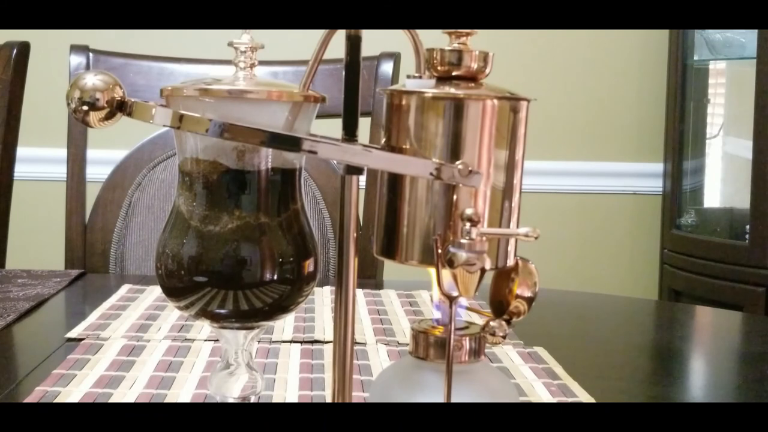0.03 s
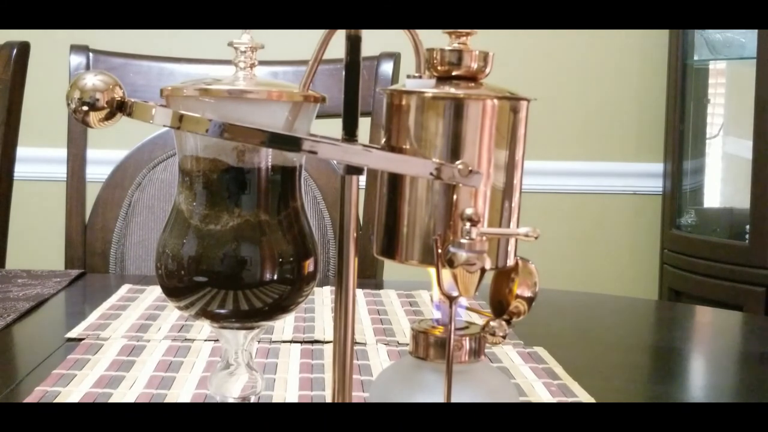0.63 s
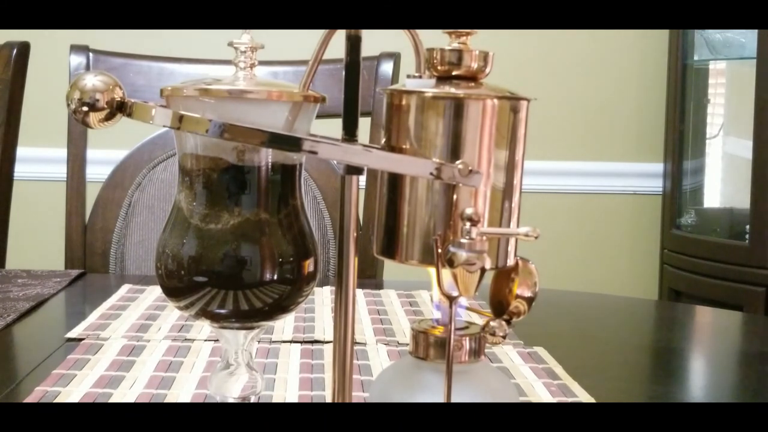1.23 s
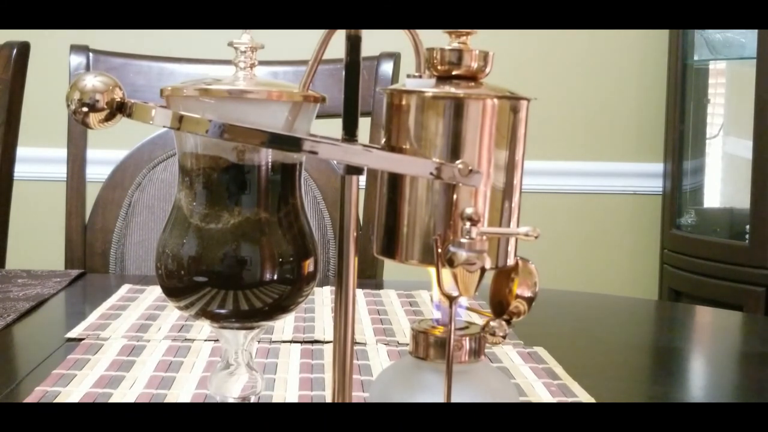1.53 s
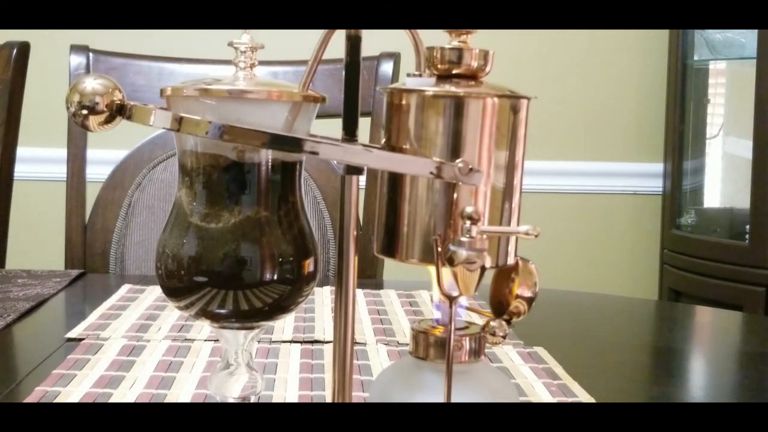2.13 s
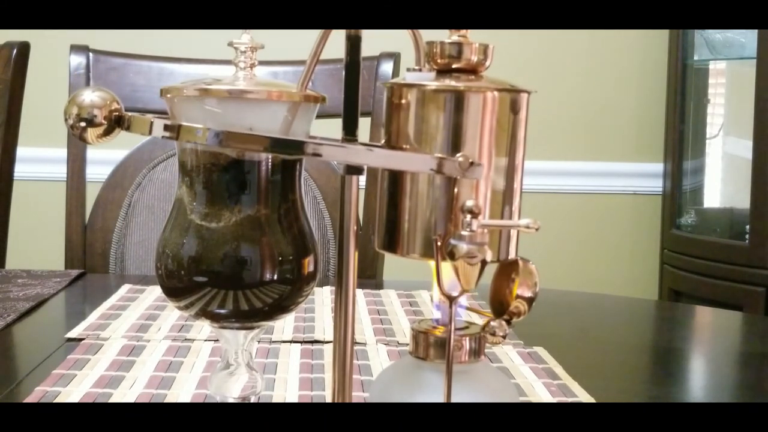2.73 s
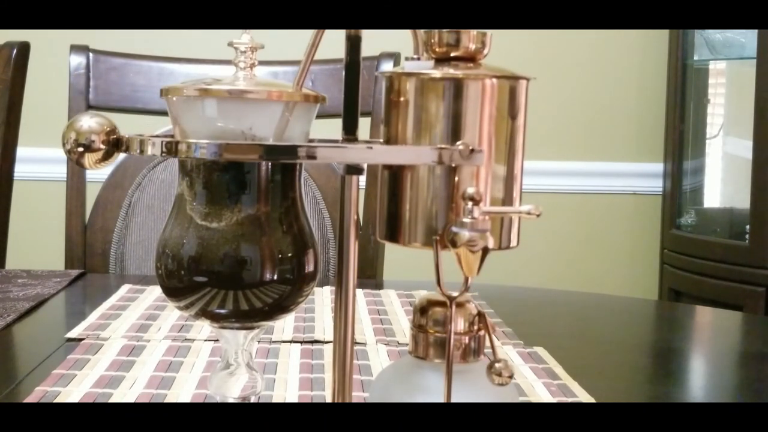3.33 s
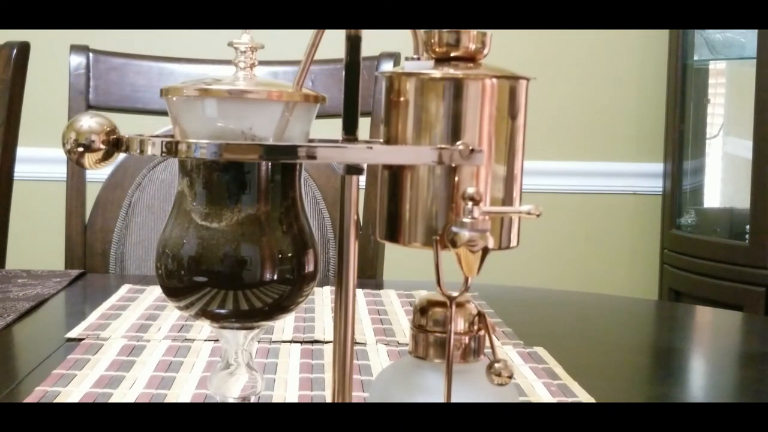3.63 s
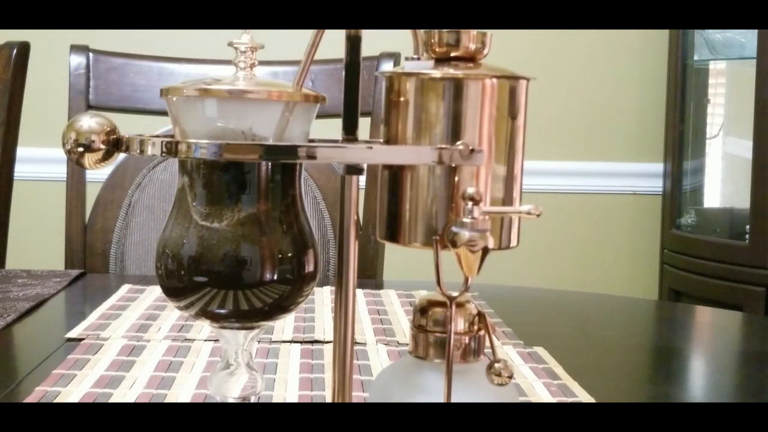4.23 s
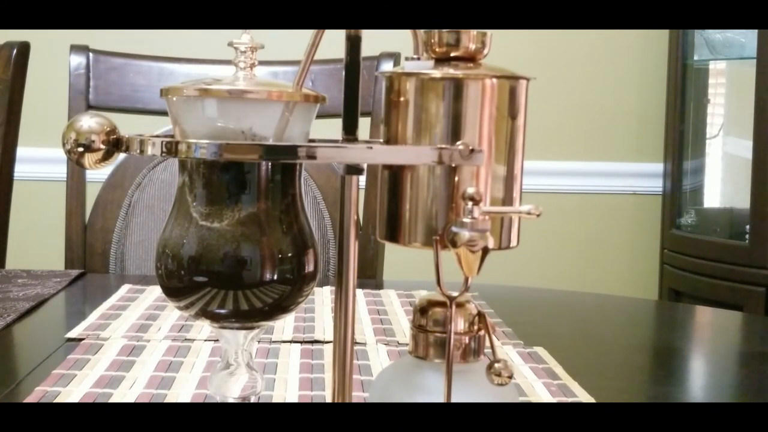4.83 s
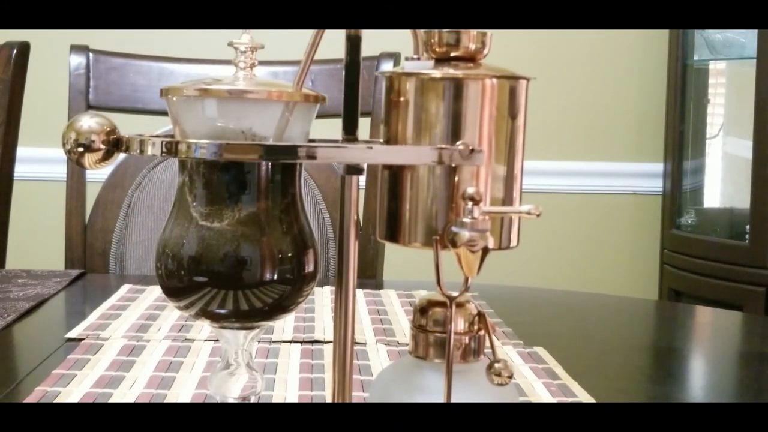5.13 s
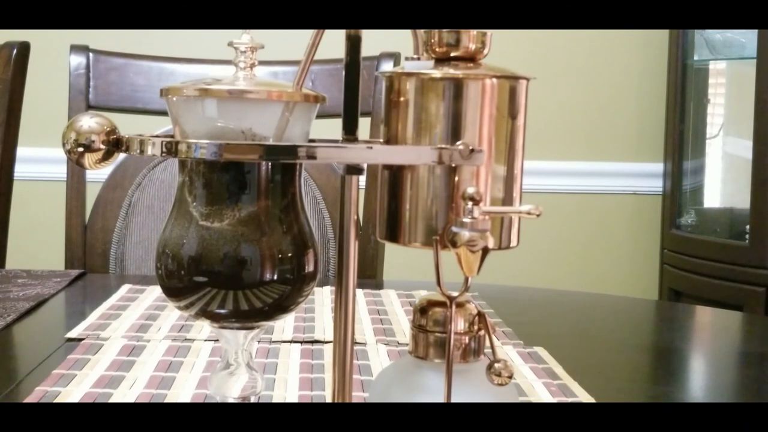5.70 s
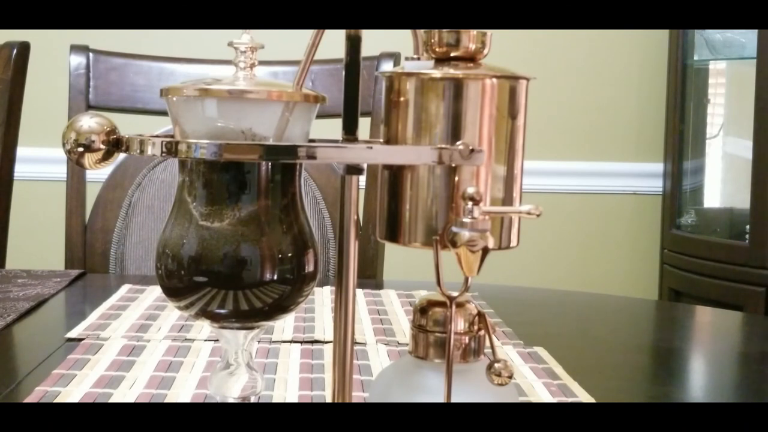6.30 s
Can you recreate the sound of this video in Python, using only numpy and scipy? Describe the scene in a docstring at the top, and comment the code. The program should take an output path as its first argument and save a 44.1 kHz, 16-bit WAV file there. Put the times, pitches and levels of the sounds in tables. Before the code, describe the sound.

Water seethes and glugs softly in the metal boiler of a siphon coffee maker while the hot metal gives small irregular ticks. About halfway through, the burner's lid scrapes free, clacks sharply shut and rattles to rest with a brief ring, thumping the table. The boiling then dies away, leaving a low hum and thin hiss. Heard close up in stereo in a quiet room.

```python
"""Balance siphon coffee maker on a dining table.

Close to a stereo pair of microphones, water seethes and glugs in the boiler and hot metal ticks.
The emptied boiler lifts and lets go of the burner's lid, which scrapes free, clacks shut and
rattles to rest, thumping the table. With the flame out the boiling dies away and leaves
the room's low hum and a thin hiss, mostly on the left."""
import sys
import numpy as np
from scipy import signal
from scipy.fft import rfft, irfft, next_fast_len
from scipy.io import wavfile
from scipy.ndimage import uniform_filter1d

SR = 44100
rng = np.random.default_rng(int(sys.argv[2]) if len(sys.argv) > 2 else 0)


def store_pcm(level_fs):
    """Save levels as 16-bit WAV."""
    pcm = np.round(np.clip(level_fs, -1, 1) * 32767).astype(np.int16)
    wavfile.write(sys.argv[1], SR, np.atleast_2d(pcm).T)


N = 280476
T = np.arange(N) / SR
FFT_SIZE = next_fast_len(N, True)
FREQS = np.fft.rfftfreq(FFT_SIZE, 1 / SR)


# the lid's blows, in relative levels: (time [s], clang [dB], shimmer [dB], table thump [dB],
# rim buzz [dB], edge ping [dB], lid ring [dB])
LID_BLOWS = [(3.0387, -25, -28.5, -25.5, -50, -52, -35), (3.0487, -32, -34, -49, -42, -56, -31),
             (3.052, -29, -34, -53, -37, -56, -30.5), (3.0574, -30, -35, -37, -48, -56, -38),
             (3.0622, -40, -44, -31, -49, -56, -37), (3.0705, -32.5, -42, -44, -50, -60, -26),
             (3.1262, -32, -31.5, -49, -42, -37, -33), (3.14, -33, -35, -59, -51, -35, -39),
             (3.154, -35, -40, -36, -54, -52, -45), (3.169, -41, -41, -61, -56, -55, -50),
             (3.196, -39, -50, -49, -49, -58, -45), (3.216, -39, -55, -44, -45, -60, -36),
             (3.227, -43, -45, -60, -44, -48, -60), (3.246, -57, -54, -60, -45, -39, -60),
             (3.275, -43, -48, -57, -44, -62, -50), (3.296, -43, -49, -46, -46, -66, -60),
             (3.3196, -49, -53, -58, -48, -70, -62), (3.355, -62, -56, -49, -51, -70, -49)]
# spectra of the clang, its bright shimmer and the rim's buzz: (frequency [Hz], relative level [dB])
CLANG_SPECTRUM = [(100, -36), (330, -4), (550, -7.5), (720, -2.5), (1000, -4.5), (1220, -2), (1550, 0.5),
                  (2000, -5), (2800, 0.5), (4000, -10.5), (5500, -14), (7000, -19), (8000, -59),
                  (16000, -34)]
SHIMMER_SPECTRUM = [(3000, -31), (7000, -23.5), (8800, -22), (10300, -8), (11700, -1.5), (12700, 2),
                    (13100, 1), (13600, -1), (15500, -1), (17000, -6.5)]
BUZZ_SPECTRUM = [(1300, -31), (1720, 0), (1900, 2), (2200, -6), (2600, -23), (5000, -41)]
# modes of lid and burner, rim and thin edge: (frequency [Hz], relative level [dB], nominal t60 [s])
LID_MODES = [(662, -22, .55), (732, -17.5, .7), (778, -20, .55), (877, -23, .7), (902, -20, .7),
             (1114, -20, .48), (1167, -7.5, .54), (1190, -16, .5), (1218, -13.5, .52), (1238, -17.5, .5),
             (1287, -16.5, .42), (1425, -18.5, .6), (1470, -20, .6), (1733, -19, .65), (1765, -19, .65),
             (2105, -22, .8), (2256, -21, .75), (2859, -26, .6), (3176, -25, .6), (3445, -28, .55),
             (13614, -25, .55), (14231, -25, .55), (14290, -24, .55), (15370, -22, .55), (15710, -27, .5)]
BUZZ_MODES = [(1815, -4, .4), (1868, -2, .45), (1943, -3, .5), (2110, -3, .65), (2191, -5, .6),
              (2240, -6, .6)]
EDGE_MODES = [(12938, 0, .28), (13066, -6, .36), (13157, -11, .5)]
def lid():
    """Close by, the lid slams on the burner, bounces and rocks on its rim, shaking the table."""
    times, clang_db, shimmer_db, thump_db, buzz_db, ping_db, ring_db = np.transpose(LID_BLOWS)
    clang = strike(times, clang_db, contact_t60=0.034, room_t60=0.58, room_db=-8, grain_db=2.5)
    shimmer = strike(times, shimmer_db, contact_t60=0.044, room_t60=0.45, room_db=-4.7, grain_db=3)
    buzz = strike(times, buzz_db, contact_t60=0.059, room_t60=0.44, room_db=-2.5, grain_db=5)
    ring = metal_ring(LID_MODES, times, ring_db - 4.5, t60_scale=1, blur_hz=2.3)
    return (at_mics(clang, tone_filter(CLANG_SPECTRUM), left_db=-4)
            + at_mics(shimmer, tone_filter(SHIMMER_SPECTRUM), left_db=-1)
            + amp(-2.5) * at_mics(buzz, tone_filter(BUZZ_SPECTRUM), left_db=-1)
            + ring * amp([[0.4], [-0.4]])
            + metal_ring(BUZZ_MODES, times, buzz_db - 7.5, t60_scale=0.93, blur_hz=7.7)
            + metal_ring(EDGE_MODES, times, ping_db - 5, t60_scale=0.92, blur_hz=4)
            + knock(times, thump_db + 3.5, hz=737, swell_s=0.00097)  # the burner's hollow clonk
            + knock(times, thump_db + 0.5, hz=203, swell_s=0.0035)  # the stand against the table
            + table_thump(times, thump_db))


def metal_ring(modes, times, db, t60_scale, blur_hz, apart=0.55):
    """Blows feed the modes; the room blurs each ringing tone, a little differently at each microphone."""
    start, length = int(min(times) * SR), 2 * SR
    span = slice(start, start + length)
    energy = impulses(times, amp(db) ** 2)[span]
    out = np.zeros((2, N))
    for hz, level, t60 in modes:
        walks = np.cumsum(rng.standard_normal((3, length)), 1)
        left, right, shared = uniform_filter1d(walks, size=200) * np.sqrt(2 * np.pi * blur_hz / SR)
        drift = shared + apart * np.array([left, right])
        tone = np.sin(2 * np.pi * (hz * T[:length] + rng.random()) + drift)
        out[:, span] += amp(level) * np.sqrt(decay(energy, t60_scale * t60)) * tone
    return out


def knock(times, db, hz, swell_s):
    """The lid's weight pushes on what lies under it, which swings once or twice."""
    t = T[:SR // 10]
    age = t / swell_s
    push = -age ** 2 * np.exp(2 * (1 - age)) * np.sin(2 * np.pi * hz * t)
    return signal.oaconvolve(impulses(times, amp(db)), push)[:N]


# the dull thud under the burner: (frequency [Hz], relative level [dB])
THUD_SPECTRUM = [(20, -28), (45, -19), (80, -3), (170, 2), (230, -3), (350, -9.5), (600, -8), (1000, -32),
                 (2000, -63)]
# the table top's modes: (frequency [Hz], relative level [dB], t60 [s])
TABLE_MODES = [(62.6, -20, 0.27), (99, -12, 0.45), (139.6, -11, 1), (147.3, -4, 1), (189.2, 2.5, 0.23),
               (224, -21, 0.14)]
def table_thump(times, db):
    """The table thuds a little to the left and booms in a few low modes; the closest two beat."""
    contacts = strike(times, db, contact_t60=0.064, room_t60=0.45, room_db=-10.5)
    thud = at_mics(contacts, tone_filter(THUD_SPECTRUM), left_db=3)
    t = T[:SR]
    ring = sum(amp(level - 60 * t / t60) * np.sin(2 * np.pi * hz * t) for hz, level, t60 in TABLE_MODES)
    boom = signal.oaconvolve(impulses(times, amp(db)), ring)[:N]
    return amp(-2) * thud + amp(-12.5) * boom


# the lid's slips off the rising boiler: (time [s], dry click [dB], bright scrape [dB])
LID_SLIPS = [(2.9906, -43.5, -57), (2.9995, -60, -40), (3.0088, -37.5, -45), (3.0175, -56, -46)]
# spectra of that click and scrape: (frequency [Hz], relative level [dB])
CLICK_SPECTRUM = [(1200, -35), (2300, -3), (2800, 1), (3400, -5), (4600, -17), (8000, -30), (12000, -12),
                  (16000, -14)]
SCRAPE_SPECTRUM = [(3000, -20), (6500, -33), (9000, -40), (11500, -19), (14000, 2), (15500, 11), (17000, 1)]
def lid_slips():
    """Just right of centre, the lid sticks and slips on the boiler's wall before it falls."""
    times, click_db, scrape_db = np.transpose(LID_SLIPS)
    click = strike(times, click_db, contact_t60=0.013, room_t60=0.65, room_db=-12.5)
    scrape = strike(times, scrape_db, contact_t60=0.1, room_t60=0.5, room_db=-8)
    return (at_mics(click, tone_filter(CLICK_SPECTRUM), left_db=-1)
            + at_mics(scrape, tone_filter(SCRAPE_SPECTRUM), left_db=-2))


# the hot metal's clearest ticks: (time [s], relative level [dB])
METAL_TICKS = [(0.1994, -51), (0.3094, -52), (0.3994, -50), (0.484, -46), (0.77, -57), (0.83, -55),
               (0.9, -54), (0.965, -61), (1.17, -49), (1.3853, -46), (1.4905, -46.5), (1.5094, -46),
               (1.936, -50.5), (1.9974, -51), (2.0308, -48), (2.1465, -51.5), (2.324, -44), (2.43, -51.5),
               (2.585, -53), (2.735, -52), (3.367, -50), (3.443, -53), (3.6077, -52), (3.6401, -51),
               (3.714, -44), (3.82, -64), (3.955, -48), (4.05, -61), (4.1859, -50), (4.2194, -51),
               (4.2991, -50), (4.4233, -47.5)]
# spectrum of a tick: (frequency [Hz], relative level [dB])
TICK_SPECTRUM = [(1200, -15), (2500, 1.5), (5300, -9), (5700, -15), (9500, -56), (10300, -9.5), (11700, -5),
                 (12700, -5), (13200, -7.5), (13600, 0), (14100, -10), (15600, -3.5), (17000, -8.5)]
# the boiler's high modes: (frequency [Hz], half-width [Hz], relative level [dB])
BOILER_MODES = [(12560, 40, -1), (13240, 35, 15), (13420, 35, 0), (14300, 40, 0), (14740, 50, 4),
                (15090, 50, 7), (15700, 45, 6)]
def metal_ticks(contacts=5, chatter_s=0.014, faint_per_s=16, faint_db=-73):
    """Hot metal ticks in tiny chatters that ring the boiler; fainter, duller ticks fall at random."""
    times, db = np.transpose(METAL_TICKS)
    ring = sum(resonance(*mode) for mode in BOILER_MODES)
    colour = unit_rms(amp(curve(TICK_SPECTRUM)))
    scatter = (np.arange(contacts) + rng.random((len(times), contacts))) / contacts - 0.25
    contact_times = (times[:, None] + chatter_s * scatter).ravel()
    contact_db = np.repeat(db, contacts) - 15
    clear = strike(contact_times, contact_db, contact_t60=0.034, room_t60=0.43, room_db=-1, grain_db=3)
    faint_times = T[(rng.random(N) < faint_per_s / SR) & (T < times[-1])]
    faint_levels = np.full(len(faint_times), faint_db)
    faint = strike(faint_times, faint_levels, contact_t60=0.05, room_t60=0.51, room_db=4.5)
    return (at_mics(clear, causal(colour * (1 + ring)), left_db=-1.5)
            + at_mics(faint, causal(colour * (1 + 0.33 * ring)), left_db=2.5))


# spectrum of the small bubbles: (frequency [Hz], relative level [dB])
SEETHE_SPECTRUM = [(120, -36), (260, -1), (400, 0), (720, -3), (950, -10), (1180, -12.5), (1480, -19),
                   (1800, -14.5), (2350, -7), (3100, -16), (4500, -37), (6000, -39), (9500, -109),
                   (12500, -28)]
# the glugs' low boom, coloured by table and room: (frequency [Hz], half-width [Hz], relative level [dB])
GLUG_MODES = [(72, 23, -1), (147.2, 10.5, 4), (185.6, 46, 1.5), (232, 200, -10)]
def boil():
    """Near the centre, small bubbles seethe and big ones glug deeply; both surge, then die away."""
    fizz = bubbles(per_s=5000, decay_cycles=2.15, rise=0.02) + amp(-3) * noise()  # in a reverberant wash
    seethe = unit_rms(at_mics(fizz, amp(curve(SEETHE_SPECTRUM)), left_db=-1))
    boom = np.sqrt(sum(resonance(*mode) ** 2 for mode in GLUG_MODES))
    glugs = unit_rms(at_mics(noise(), boom, left_db=0.5))
    tick_times, tick_db = np.transpose(METAL_TICKS)
    sputter = decay(impulses(tick_times, amp(tick_db - 7) ** 2), t60=0.42)  # a flare-up with each tick
    seethe_db = -52 + cooling(lasts_s=2.24, knee=3) + surges(rms_db=1.1, slow_hz=1.456, fast_hz=12)
    glug_db = -56.5 + cooling(lasts_s=2.39, knee=4.7) + surges(rms_db=2, slow_hz=2.5, fast_hz=14)
    return seethe * np.sqrt(amp(seethe_db) ** 2 + sputter) + glugs * amp(glug_db)


def bubbles(per_s, decay_cycles, rise, sizes=24):
    """Bubbles of all sizes, each a short dying tone that rises a little; together spectrally even."""
    out = np.zeros((2, N))
    count = int(per_s * N / SR / sizes)
    for hz in np.geomspace(110, 15000, sizes):
        age = np.arange(int(5 * decay_cycles * SR / hz)) * hz / SR / decay_cycles
        tone = np.exp(-age) * np.sin(2 * np.pi * decay_cycles * age * (1 + rise * age))
        for channel in out:
            births = np.bincount(rng.integers(0, N, count), rng.choice([-1, 1], count), N)
            channel += np.sqrt(hz) * unit_rms(signal.oaconvolve(births, tone)[:N])
    return unit_rms(out)


def cooling(lasts_s, knee, flame_out_s=3.08):
    """The lid smothers the flame; on stored heat the boil sinks ever faster, by 10 dB after lasts_s."""
    return -10 * (np.maximum(T - flame_out_s, 0) / lasts_s) ** knee


def surges(rms_db, slow_hz, fast_hz):
    """The boil's random swelling, in dB."""
    t = T[::100]
    swell = sum(np.sin(2 * np.pi * (hz * t + rng.random())) for hz in np.geomspace(slow_hz, fast_hz, 24))
    return rms_db * np.interp(T, t, unit_rms(swell))


# the room's hum: (frequency [Hz], density [dB per Hz])
HUM_SPECTRUM = [(15, -90), (25, -85), (33, -99), (45, -84.5), (70, -87), (105, -94), (140, -87.5),
                (180, -99.5), (240, -99), (380, -91.5), (620, -93.5), (900, -106), (1500, -125),
                (3000, -150)]
# steady hiss: (frequency [Hz], left [dB per Hz], right [dB per Hz])
HISS_SPECTRUM = [(587, -106, -112), (1155, -93.5, -106), (1300, -110, -112), (1640, -104, -109),
                 (2010, -84.5, -103.5), (2720, -97, -101), (3110, -94.5, -94.5), (3440, -93, -108),
                 (4050, -89, -114), (4550, -93, -116), (5570, -119, -120), (9800, -121, -122),
                 (10170, -111, -116), (16100, -113, -113)]
def room_tone():
    """In the background, a low hum in both microphones and a hiss mostly in the left one."""
    hum = at_mics(noise(), amp(curve(HUM_SPECTRUM)))
    hiss = at_mics(noise(), amp([curve(HISS_SPECTRUM, column=1), curve(HISS_SPECTRUM, column=2)]))
    return np.sqrt(SR / 2) * (hum + hiss)


# likeness of the sound at the two microphones: (frequency [Hz], correlation [-1 to 1])
MIC_CORRELATION = [(60, 0.77), (130, 0.9), (290, 0.94), (640, 0.63), (1400, -0.066), (3000, -0.24),
                   (7000, -0.039)]
def at_mics(pair, response, left_db=0):
    """Filters two unrelated signals onto the microphones, which share the bass but not the treble."""
    a, b = rfft(pair, FFT_SIZE)
    likeness = np.clip(curve(MIC_CORRELATION), -1, 1)
    mid, side = a * np.sqrt((1 + likeness) / 2), b * np.sqrt((1 - likeness) / 2)
    stereo = irfft(np.array([mid + side, mid - side]) * response, FFT_SIZE)[:, :N]
    return stereo * amp([[left_db / 2], [-left_db / 2]])


def strike(times, db, contact_t60, room_t60, room_db, grain_db=0):
    """Each blow is a burst of tiny contacts, uneven by grain_db, followed by the room's diffuse tail."""
    energy = impulses(times, amp(db) ** 2)
    steps = T[::32]
    strengths = amp(grain_db * np.minimum(rng.standard_normal(len(steps)), 2))
    grain = unit_rms(np.interp(T, steps, strengths))
    direct = grain ** 2 * decay(energy, contact_t60)
    tail = amp(room_db) ** 2 * decay(energy, room_t60)
    return noise() * np.sqrt(direct + tail)


def amp(db):
    """Decibels to gain."""
    return 10 ** (np.asarray(db) / 20)


def unit_rms(x):
    """Scales to rms 1."""
    return x / np.sqrt(np.mean(abs(x) ** 2) + 1e-30)


def noise():
    """Two unrelated white noises."""
    return rng.standard_normal((2, N))


def impulses(times, sizes):
    """One impulse for each event."""
    return np.bincount(np.round(np.asarray(times) * SR).astype(int), sizes, N)[:N]


def decay(energy, t60):
    """Energy that leaks away by 60 dB in t60 seconds."""
    return signal.lfilter([1], [1, -10 ** (-6 / (t60 * SR))], energy)


def resonance(hz, half_width, db):
    """One mode's gain over all frequencies."""
    return amp(db) / (1 + ((FREQS - hz) / half_width) ** 2)


def curve(points, column=1):
    """A table's column over all frequencies, joined on a log axis."""
    table = np.transpose(points)
    return np.interp(np.log(FREQS + 1), np.log(table[0]), table[column])


def causal(gain):
    """The filter with this gain that rings only after its input."""
    cepstrum = irfft(np.log(np.maximum(gain, 1e-5 * gain.max())), FFT_SIZE)
    cepstrum[1:FFT_SIZE // 2] *= 2
    cepstrum[FFT_SIZE // 2 + 1:] = 0
    return np.exp(rfft(cepstrum))


def tone_filter(spectrum):
    """A causal filter of rms gain 1, shaped like the spectrum."""
    return causal(unit_rms(amp(curve(spectrum))))


# standing waves between table and walls: (frequency [Hz], width [Hz], gain [dB])
STANDING_WAVES = [(27, 5, 6), (40, 6, -6), (74, 9, 3), (136, 10, 3), (185, 9, 4), (205, 8, -3),
                  (348, 14, 3), (401, 10, 4), (450, 14, -6), (511, 12, 5), (570, 16, -5), (670, 25, 2),
                  (729, 12, 2), (815, 15, -2), (903, 9, 3), (985, 40, -2)]
def scene():
    """Everything as heard at the table, where the room's standing waves lift and sink narrow bands."""
    mix = lid() + lid_slips() + metal_ticks() + boil() + room_tone()
    colour_db = sum(db * np.exp(-((FREQS - hz) / width) ** 2) for hz, width, db in STANDING_WAVES)
    return irfft(rfft(mix, FFT_SIZE) * causal(amp(colour_db)), FFT_SIZE)[:, :N]


def record(dry):
    """The recorder's band limit."""
    lowpass = signal.firwin(511, 15780, window=("kaiser", 9), fs=SR)
    return signal.oaconvolve(dry, lowpass[None], "same")


dry = scene()
out = record(dry)
store_pcm(out)
```